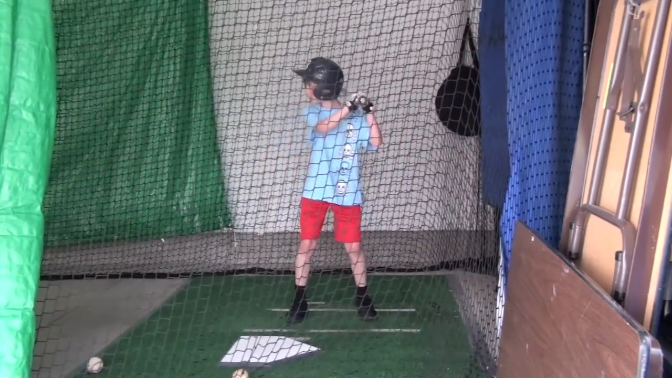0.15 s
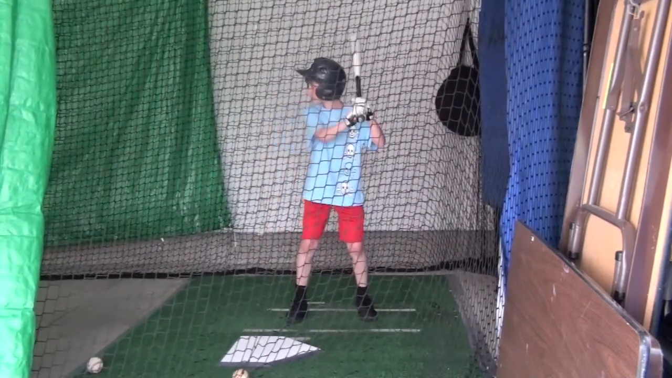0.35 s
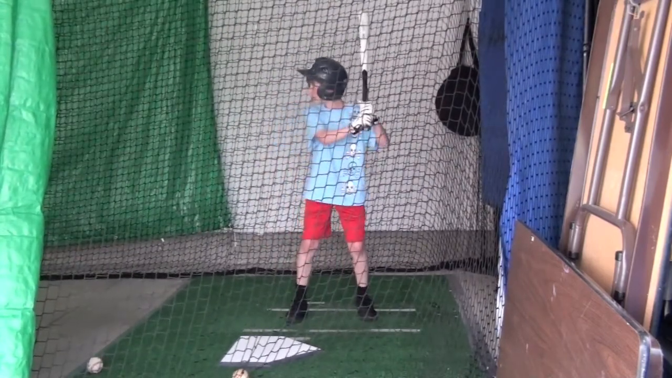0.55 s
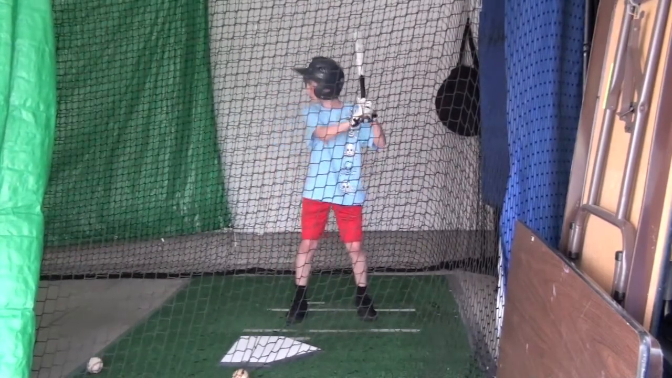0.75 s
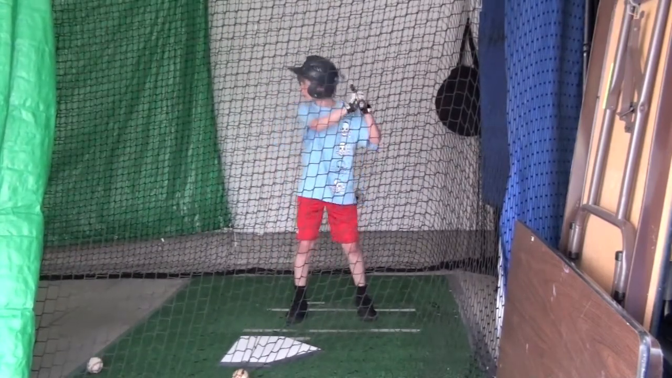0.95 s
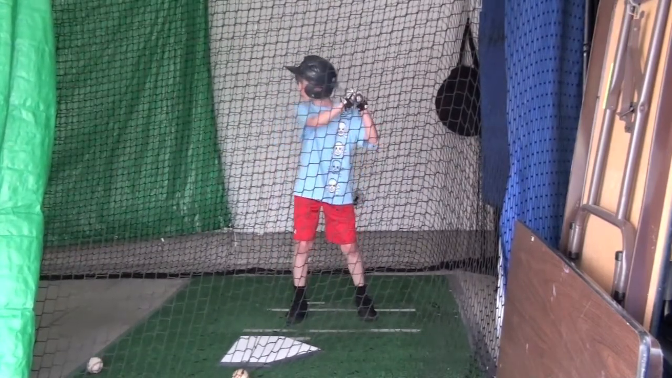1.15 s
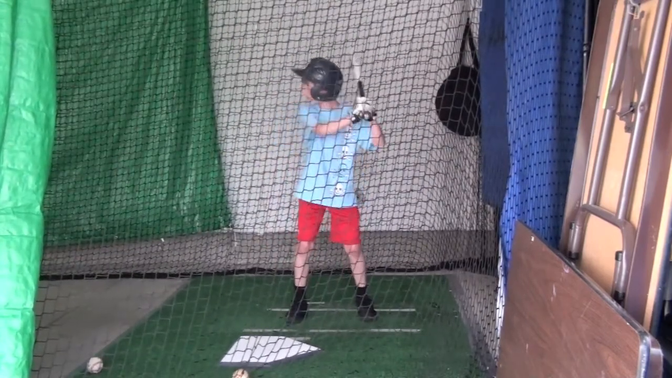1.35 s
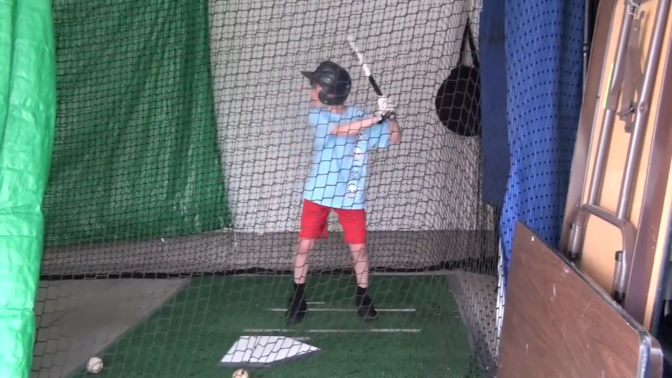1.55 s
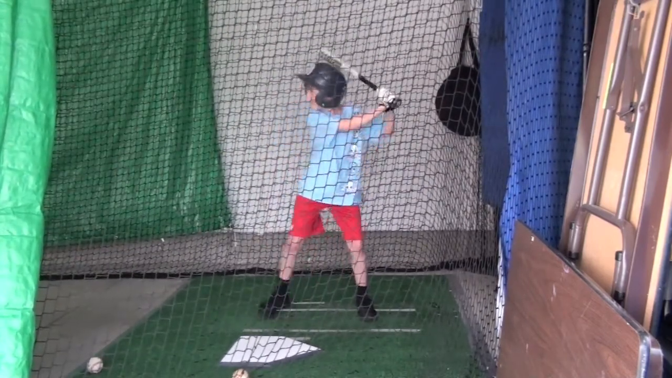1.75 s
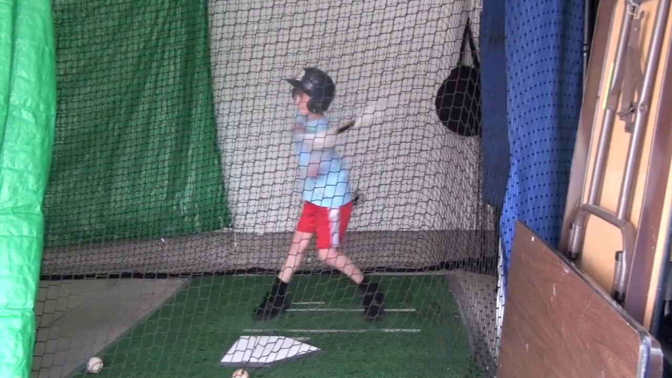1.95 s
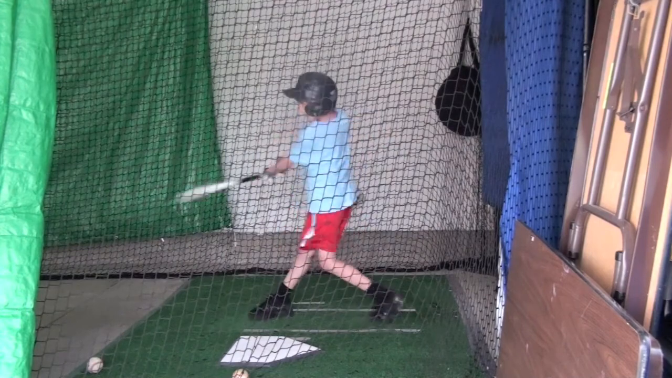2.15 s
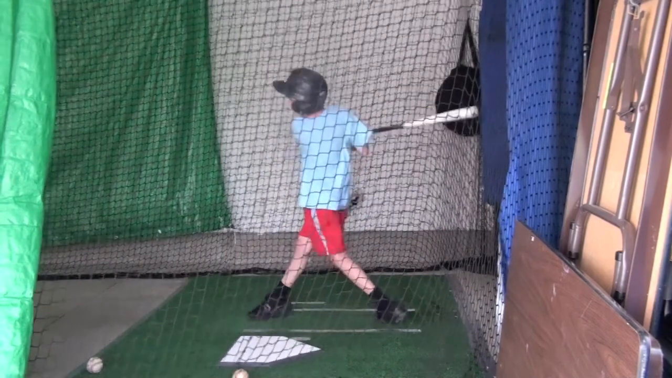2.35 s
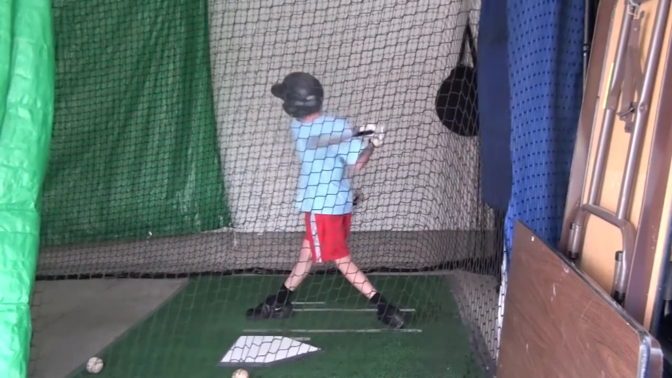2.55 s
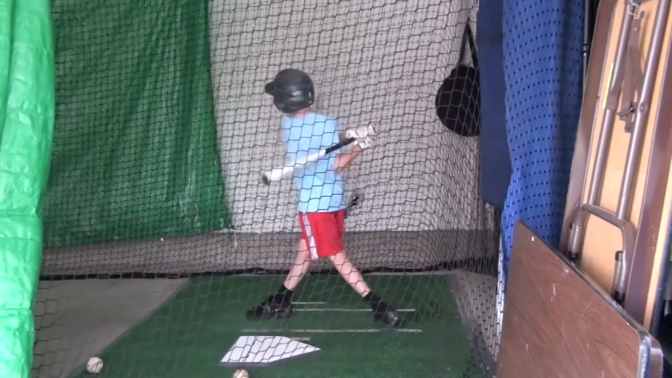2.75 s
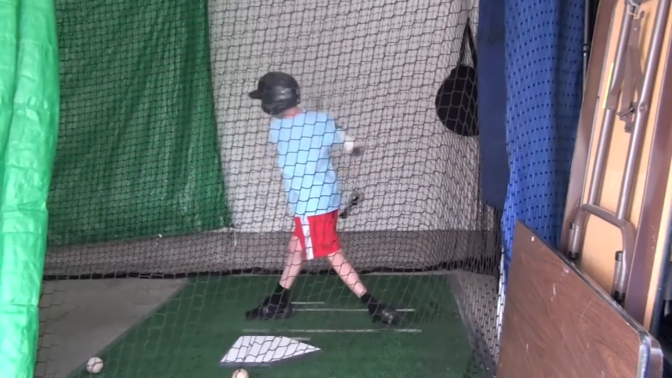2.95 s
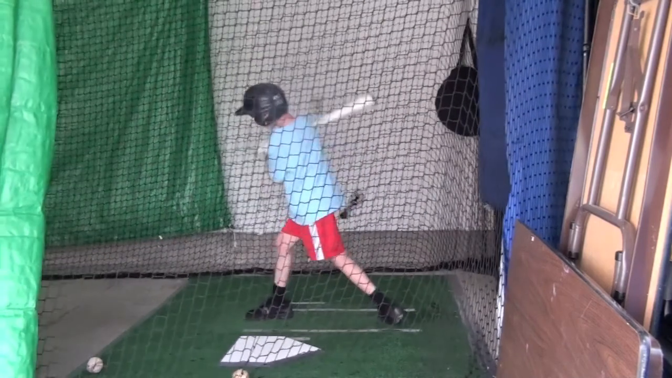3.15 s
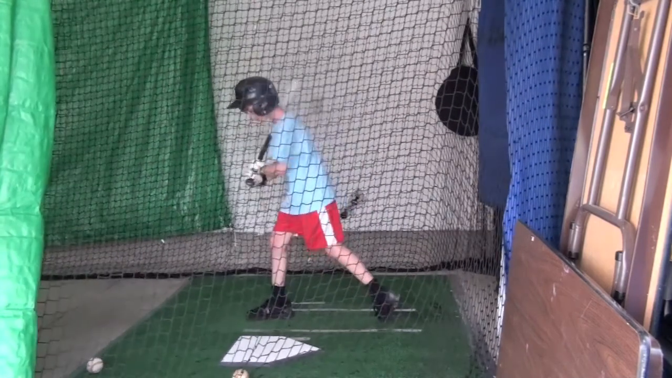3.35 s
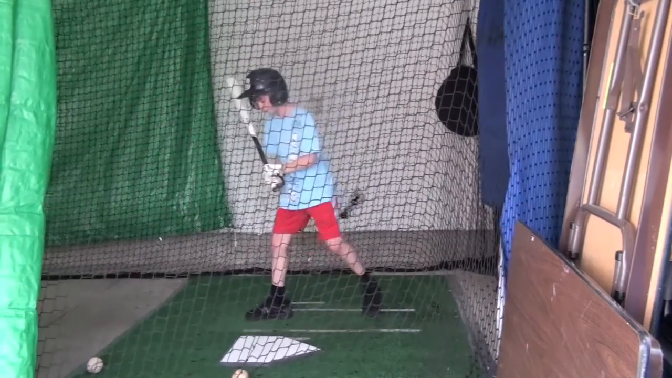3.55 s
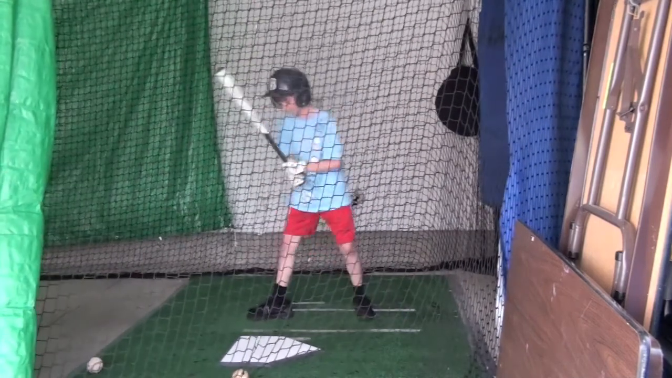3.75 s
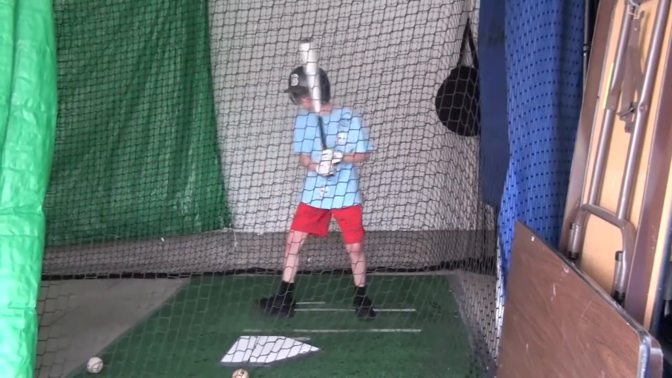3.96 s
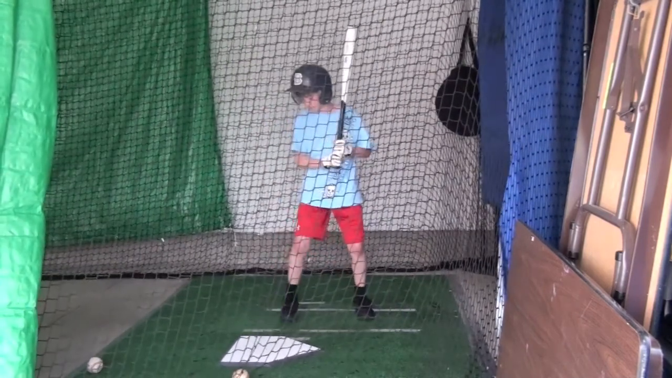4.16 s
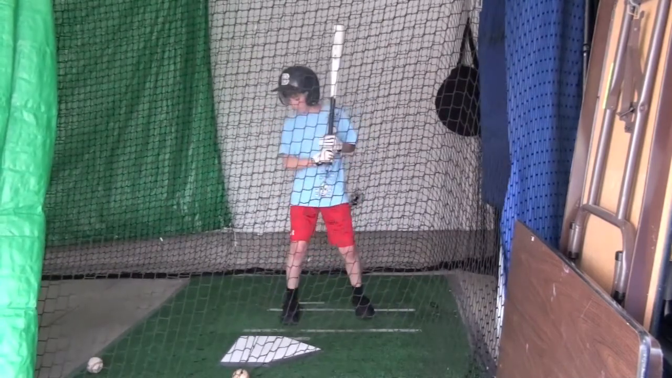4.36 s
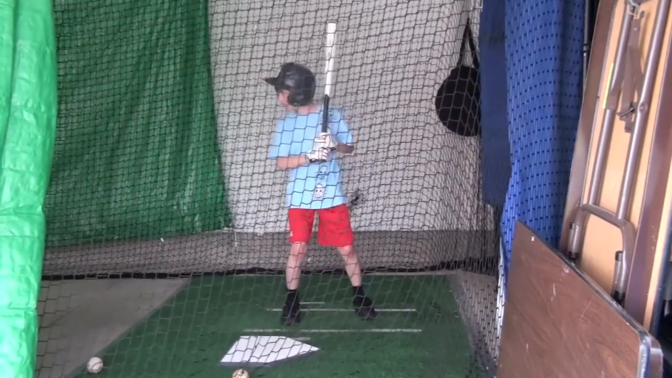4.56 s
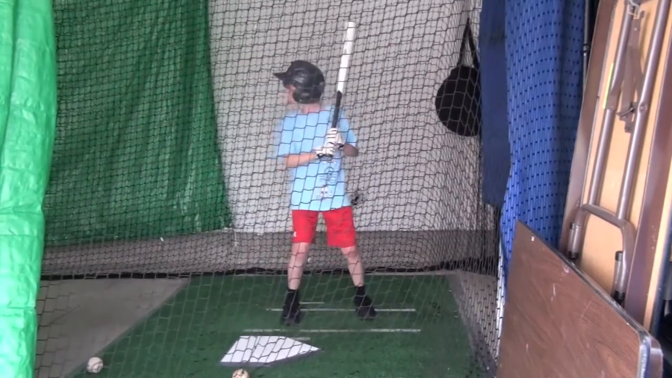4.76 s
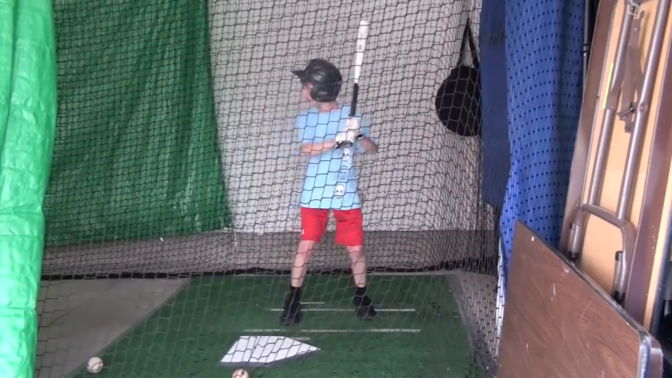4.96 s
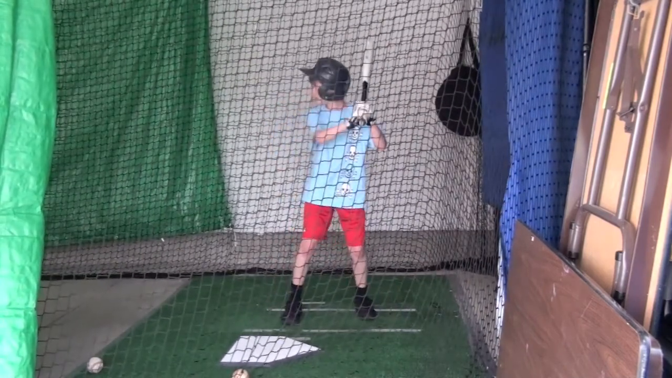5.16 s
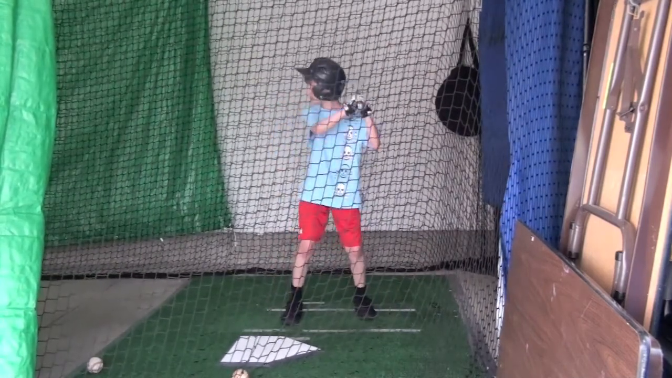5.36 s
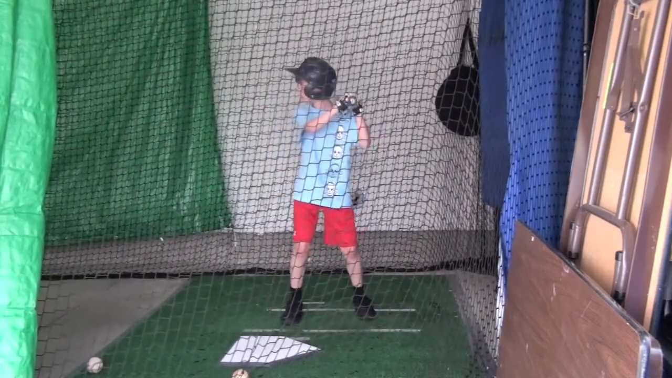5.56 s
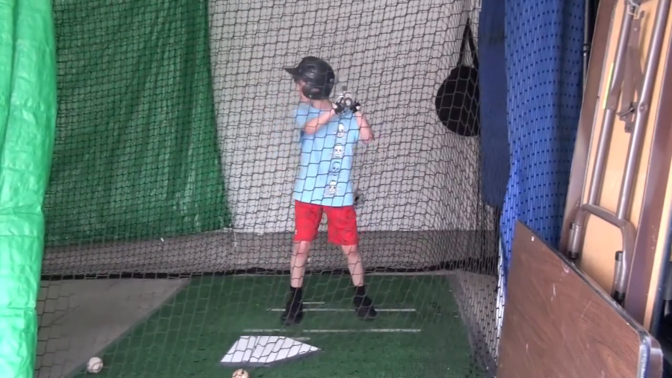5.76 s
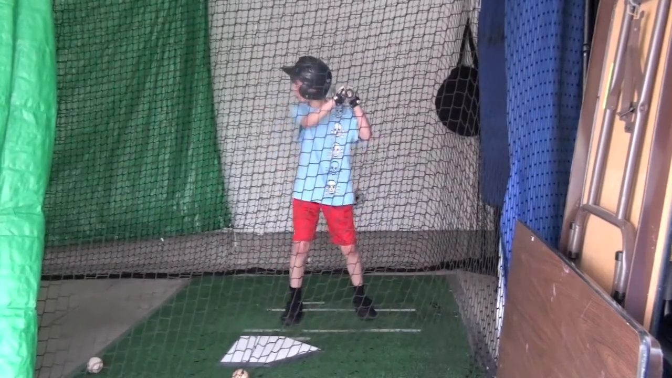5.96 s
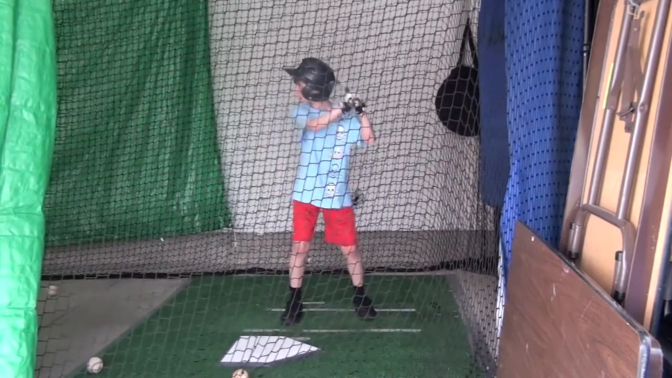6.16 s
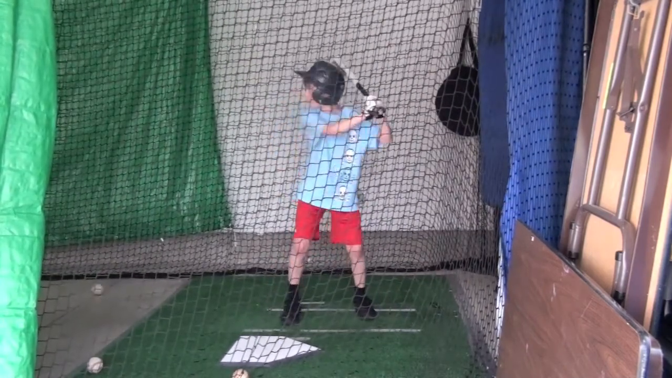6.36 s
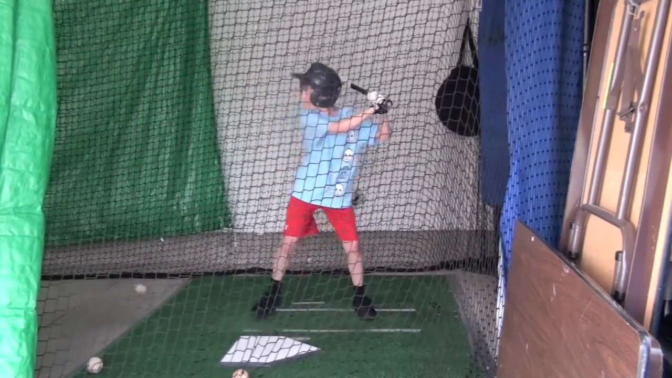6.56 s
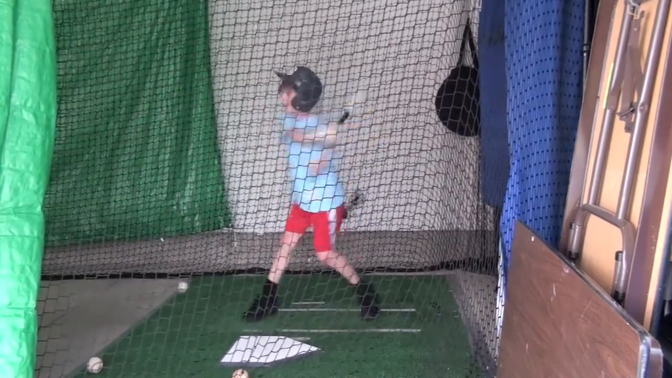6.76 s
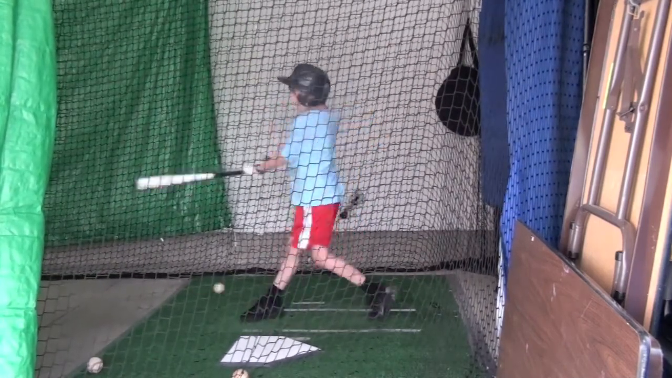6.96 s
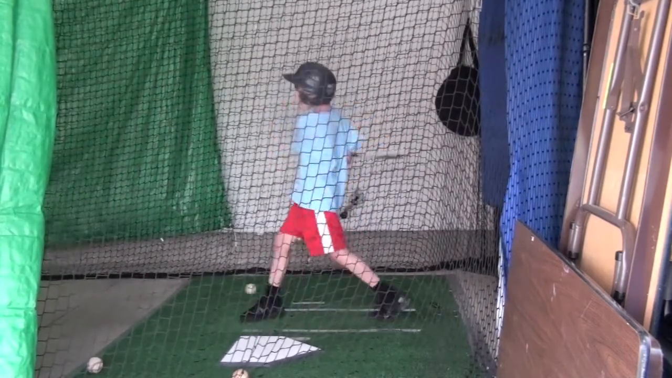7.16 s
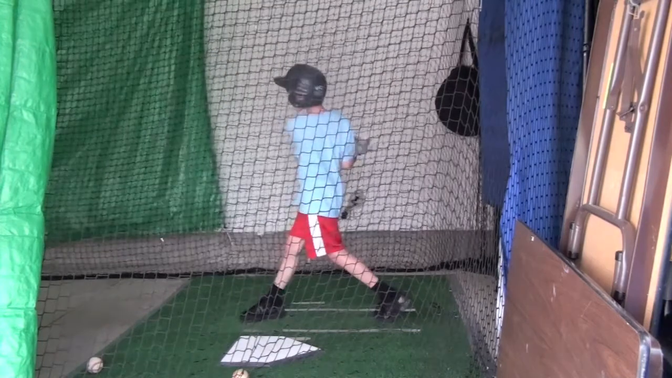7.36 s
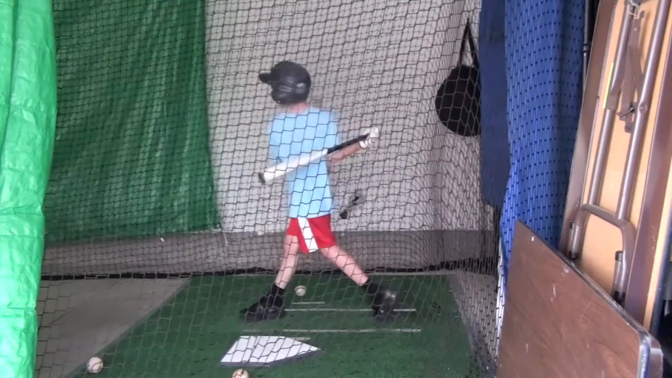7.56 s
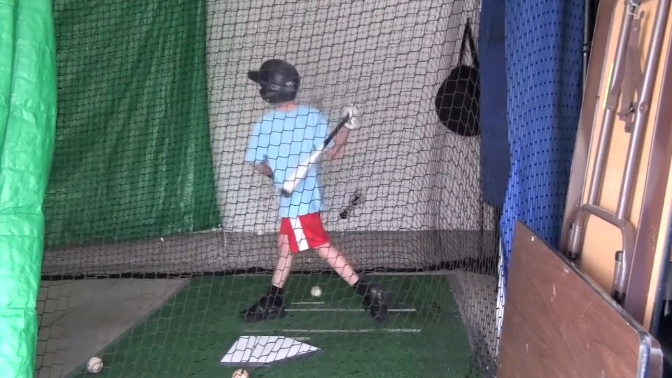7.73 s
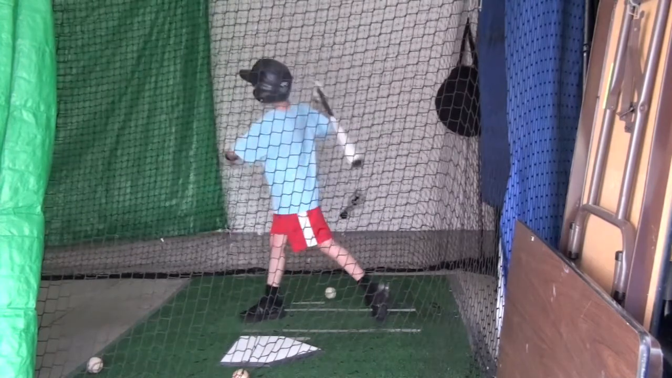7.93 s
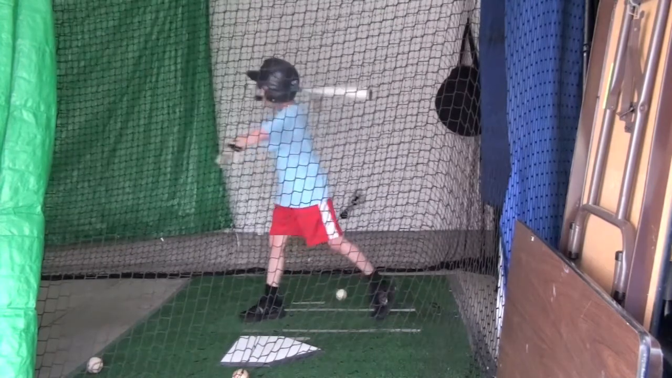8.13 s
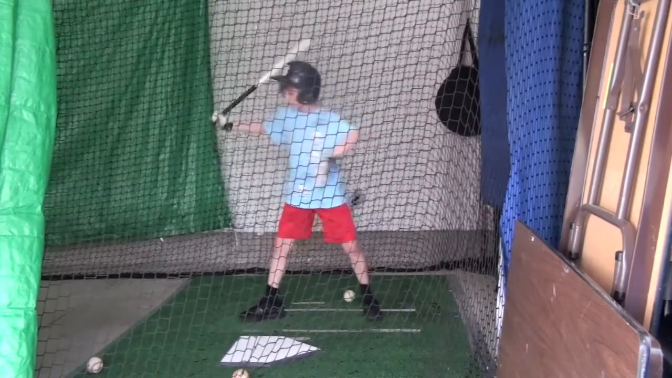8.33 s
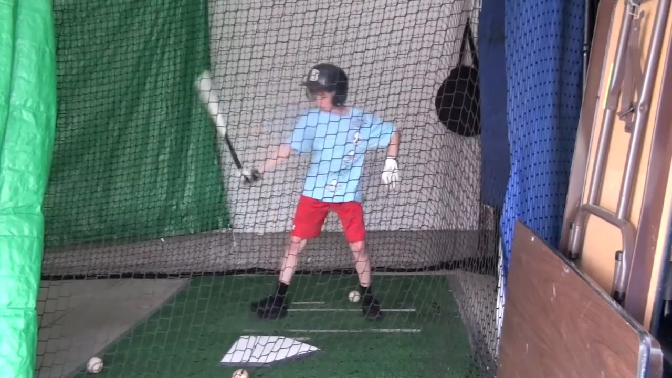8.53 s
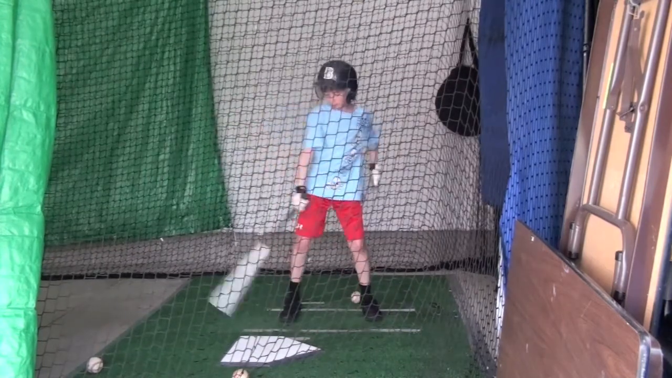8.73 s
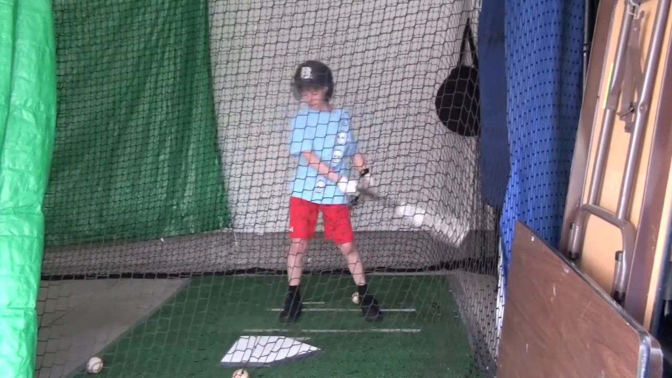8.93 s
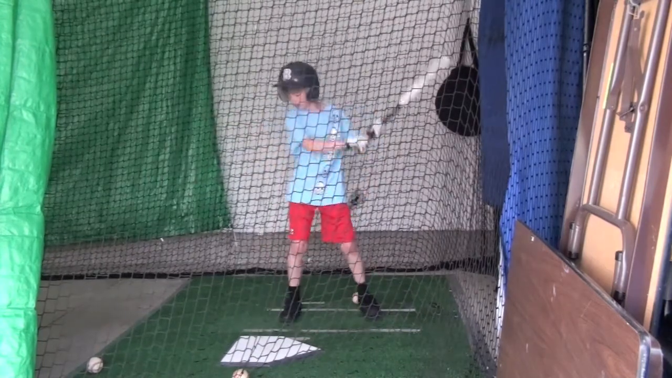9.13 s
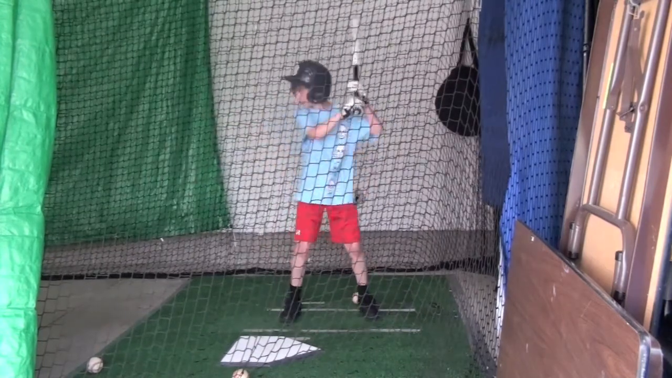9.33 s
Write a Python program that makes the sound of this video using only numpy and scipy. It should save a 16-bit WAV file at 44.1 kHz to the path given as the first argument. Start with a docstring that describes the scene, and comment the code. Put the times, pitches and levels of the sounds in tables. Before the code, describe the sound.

Two sharp cracks of a metal bat on a baseball, about five seconds apart, ring out with a short garage echo. Between them come a double thud against the cage, a shoe rasping on turf and a clack. After the second, the netting swishes and the ball thumps through quickening, fading bounces before a soft scuff. The camera microphone flattens both pings, while a low hum, distant chirps and light clothing rustles fill the gaps.

```python
"""Two loud metal-bat pings in a garage batting cage, among knocks, net swishes, bounces and rustles.
Each hit is a crack plus the barrel's ring, Doppler-spread by the swing as the walls return it.
Balls knock about the cage, rub its mesh and thump on turf; a shoe and the bat's tip scuff the ground.
Birds call faintly outside, over a low motor hum. The camera's limiter flattens each ping,
and its gain control ducks the background for two seconds after."""
import sys
import numpy as np
from scipy import signal
from scipy.fft import rfft, irfft, next_fast_len
from scipy.io import wavfile
from scipy.ndimage import uniform_filter1d, minimum_filter1d, map_coordinates

SR = 44100
rng = np.random.default_rng(int(sys.argv[2]) if len(sys.argv) > 2 else 0)


def pcm_store(signal):
    """Save signal as 16-bit PCM."""
    levels = np.round(np.clip(np.atleast_2d(signal), -1, 1) * 32767)
    wavfile.write(sys.argv[1], SR, levels.astype(np.int16).T)


N = 418509

# bat on ball: (time [s], crack [dB], near walls [dB], crack tilt [dB/oct], ring [dB], bat speed [m/s],
# pitch [ratio], second mode offset [dB], grip damping [ratio])
BAT_HITS = [(2.146, 35, -3, -1.1, 18.5, 11.2, 1.0, -0.5, 1.76),
            (6.9634, 37.5, 0.5, -0.16, 17.5, 9.54, 1.001, -4, 1.36)]


def amp(db):
    """Decibels to gain."""
    return 10 ** (np.asarray(db) / 20)


def unit(x):
    """x at rms 1."""
    return x / np.sqrt(np.mean(x ** 2) + 1e-20)


def along(points, hz):
    """Interpolate (frequency [Hz], value) points on a log axis."""
    knots_hz, values = np.transpose(points)
    return np.interp(np.log(hz + 1), np.log(knots_hz + 1), values)


def tilt(hz, db_per_oct):
    """Treble slope above about 500 Hz, in dB."""
    return db_per_oct * np.log2(1 + hz / 500)


def filtered(x, response):
    """Zero-phase filter with gain response(hz)."""
    n = x.shape[-1]
    padded = next_fast_len(n + 8192)
    hz = np.fft.rfftfreq(padded, 1 / SR)
    return irfft(rfft(x, padded) * response(hz), padded)[..., :n]


def noise(spectrum, shape, db_per_oct=0):
    """Coloured noise of rms 1."""
    white = rng.standard_normal(shape)
    return unit(filtered(white, lambda hz: amp(along(spectrum, hz) + tilt(hz, db_per_oct))))


def pulse(gain_db, db_per_oct=0):
    """Minimum-phase click of energy 1 with the tilted spectrum gain_db(hz)."""
    hz = np.fft.rfftfreq(4096, 1 / SR)
    cepstrum = irfft(np.log(amp(gain_db(hz) + tilt(hz, db_per_oct))))
    half = len(cepstrum) // 2
    click = irfft(np.exp(rfft(2 * cepstrum[:half], 2 * half)))
    return np.pad(click / np.linalg.norm(click), (0, SR))


def ring(modes, t, pitch=1, damping=1):
    """Damped modes, all struck at t = 0."""
    return sum(amp(db - 60 * damping * t / t60_s) * np.sin(2 * np.pi * hz * pitch * t)
               for hz, db, t60_s in modes)


def wobble(rate_hz, size=N):
    """Smooth curve through random knots."""
    knots = rng.standard_normal(int(size * rate_hz / SR) + 4)
    return map_coordinates(knots, [np.arange(size) * rate_hz / SR])


def swell(t, rise_s, fall_s):
    """Rounded envelope peaking at 2 * rise_s."""
    from_peak_s = t - 2 * rise_s
    return np.exp(-(from_peak_s / np.where(from_peak_s < 0, rise_s, fall_s)) ** 2)


def add(track, at_s, sound):
    """Mix a sound into a stereo track."""
    start = max(round(at_s * SR), 0)
    track[:, start:start + sound.shape[1]] += sound[:, :N - start]


def stereo(pair, width):
    """Two unrelated signals as a diffuse field at two close microphones."""
    side = filtered(pair[1], lambda hz: amp(along(width, hz)))
    return np.array([pair[0] + side, pair[0] - side])


def garage(x, direct_db, near_db=-4):
    """Direct path, brief dense cluster off the near walls and a fresh diffuse tail."""
    # reverberation: (frequency [Hz], t60 [s])
    decay = [(100, 0.46), (250, 0.66), (600, 0.71), (1000, 0.72), (1700, 0.71), (3000, 0.7), (7000, 0.61),
             (14000, 0.36)]
    # echo width: (frequency [Hz], side re mid [dB])
    width = [(50, -14), (130, -7), (500, -7.5), (1700, -10), (5000, -10.5), (9000, -8.5), (12000, -20)]
    near_decay_s, build_s = 0.018, 0.001
    hz, frame_s, bins = signal.stft(rng.standard_normal((2, SR)), SR, nperseg=256)
    tail = signal.istft(bins * amp(-60 * frame_s / along(decay, hz)[:, None]), SR, nperseg=256)[1]
    t = np.arange(tail.shape[1]) / SR
    near = rng.standard_normal(tail.shape) * np.exp(-t / near_decay_s)
    build = 1 - np.exp(-t / build_s)
    echo = stereo((unit(tail) + amp(near_db) * unit(near)) * build, width)
    response = echo / np.linalg.norm(echo[0])
    response[:, 0] += amp(direct_db)
    response /= np.linalg.norm(response[0])
    return signal.fftconvolve(x[None], response, axes=1)[:, :len(x)]


def rub(envelope, db_per_oct):
    """Sliding friction in the garage: many small catches under an envelope."""
    # fabric friction: (frequency [Hz], density [dB])
    cloth = [(60, -30), (300, -16), (800, -9), (3000, -4.5), (6000, -7), (9000, -9.5), (12000, -10),
             (15500, -26)]
    friction = noise(cloth, len(envelope), db_per_oct)
    catches = amp(5.1 * wobble(305.1, size=len(envelope)))
    return garage(envelope * unit(friction * catches), direct_db=-4)


def background():
    """Steady motor hum, rumble and microphone hiss; building murmur and outdoor wash recede later on."""
    # noise spectra: (frequency [Hz], density [dB])
    rumble_spectrum = [(20, -21), (35, -3.5), (55, -1.5), (85, -5), (120, 2.5), (190, 2), (400, -28),
                       (1000, -39.5)]
    murmur_spectrum = [(80, -19), (170, -7), (270, 3.5), (400, -5.5), (600, -12.5), (1200, -69)]
    wash_spectrum = [(150, -5), (500, -0.5), (1000, 1.5), (2000, -5), (4000, -17.5), (8000, -25),
                     (15500, -45)]
    hiss_spectrum = [(500, 2.5), (3000, 7.5), (5000, 4.5), (9000, -4.5), (12500, -3), (15500, -5)]
    # background width: (frequency [Hz], side re mid [dB])
    width = [(60, -29), (110, -25.5), (200, -26.5), (380, -14), (700, -9), (1290, -6.5), (2380, -6),
             (4400, -5.5), (8120, -4.5), (15000, -16)]
    sag_at_s, sag_db_per_s = 4.4, 1.4
    recede_at_s, recede_db_per_s, wash_floor_db = 3.21, 3.5, -53.5
    hum_hz = 59.3
    t = np.arange(N) / SR
    echo_db = 5 * np.exp(-t / 0.19)  # an earlier sound's echo dies away at the start
    rumble = amp(-50.5) * noise(rumble_spectrum, (2, N))
    murmur_db = -45 - sag_db_per_s * np.maximum(t - sag_at_s, 0)
    murmur = amp(murmur_db + echo_db + 0.7 * wobble(7.6)) * noise(murmur_spectrum, (2, N))
    wash_db = np.maximum(-44.5 - recede_db_per_s * np.maximum(t - recede_at_s, 0), wash_floor_db)
    wash = amp(wash_db + echo_db) * noise(wash_spectrum, (2, N))
    hiss = amp(-55.5) * noise(hiss_spectrum, (2, N))
    hum = amp(-48.5 + 1.3 * wobble(4.4)) * np.sin(2 * np.pi * hum_hz * t + 0.2 * wobble(5))
    return stereo(rumble + murmur + wash + hiss, width) + hum


def bird_note(t, length_s, from_hz, to_hz, buzz_hz=0):
    """A whistle glides to its final pitch; a fast warble turns it into a buzz."""
    warble_hz, glide_s = 77, 0.0344
    progress = np.minimum(t / length_s, 1)
    warble = 0.85 * np.sin(2 * np.pi * warble_hz * t) + 0.281 * wobble(250, size=len(t))
    hz = to_hz + (from_hz - to_hz) * np.exp(-t / glide_s) * (1 - progress) + buzz_hz * warble
    envelope = np.minimum(4 * np.abs(np.sin(np.pi * progress)), 1)
    return envelope * np.sin(2 * np.pi * np.cumsum(hz) / SR)


def birds(t):
    """Four kinds of call drift in from outside."""
    # slurs up to a held note: (time [s], length [s], top pitch [Hz], level [dB])
    slurs = [(0.103, 0.036, 4650, -51), (.36, .05, 4630, -59), (0.578, .05, 4040, -54),
             (1.23, .045, 4200, -62), (4.79, 0.08, 4010, -54.5), (5.508, .085, 4330, -63)]
    # quick falling chips: (time [s], level [dB])
    chips = [(5.298, -55), (5.555, -54), (5.724, -56), (5.883, -54), (6.052, -57)]
    # level, buzzing trills: (time [s], level [dB])
    trills = [(1.36, -46.5), (2.95, -47.5)]
    # rising buzzes that clear into a whistle: (time [s], level [dB], whistle delay [s])
    wheezes = [(6.236, -48, 0.0135), (6.612, -47.5, .07)]
    calls = [(at_s, db, bird_note(t, length_s, 0.94 * hz, hz)) for at_s, length_s, hz, db in slurs]
    calls += [(at_s, db, bird_note(t, 0.0295, 3850, 2900)) for at_s, db in chips]
    calls += [(at_s, db, bird_note(t, 0.55, 2560, 2560, buzz_hz=275)) for at_s, db in trills]
    for at_s, db, delay_s in wheezes:
        calls.append((at_s, db, bird_note(t, 0.165, 2750, 3030, buzz_hz=275)))
        calls.append((at_s + delay_s, db - 5, bird_note(t, 0.212, 2750, 3445)))
    out = np.zeros((2, N))
    for at_s, db, call in calls:
        add(out, at_s, garage(amp(db) * np.sqrt(2) * call, direct_db=1))
    return out


def rustles_and_shuffle(t):
    """Soft rustles of clothes and netting, and one low foot shuffle; each rises faster than it falls."""
    # (peak time [s], length [s], level [dB], tilt [dB/oct]); the steepest tilt is the shuffle
    rubs = [(2.661, 0.41, -41, -3), (3.066, .07, -34.5, -10), (4.897, .07, -48.5, -6.5),
            (5.181, .065, -49.5, -4), (6.329, .14, -45.5, -29), (6.466, 0.05, -53, 0),
            (7.771, 0.23, -40, -4.5), (8.449, .6, -54, 1.5), (8.748, .09, -44, -2), (9.356, .1, -44, -5)]
    out = np.zeros((2, N))
    for peak_s, length_s, db, db_per_oct in rubs:
        rise_s = 0.34 * length_s
        add(out, peak_s - 2 * rise_s, rub(amp(db) * swell(t, rise_s, length_s - rise_s), db_per_oct))
    return out


def shoe_drag(t):
    """A shoe slides over turf with a thin rasp, speeding up and slowing down."""
    # sole friction: (frequency [Hz], density [dB])
    sole = [(1000, -20), (2500, -14), (3200, 3), (3650, -7), (4300, -0.5), (4850, -2.5), (5600, -4.5),
            (7500, -13.5), (10000, -16.5), (15500, -26)]
    at_s, length_s = 3.655, 0.33
    speed = np.sin(np.pi * np.minimum(t / length_s, 1))
    out = np.zeros((2, N))
    add(out, at_s, garage(amp(-40) * speed * noise(sole, len(t)), direct_db=-11))
    return out


def bat_scuff(t):
    """The bat's tip swings down and scuffs the turf."""
    # tip on turf: (frequency [Hz], density [dB])
    scuff = [(200, -21), (550, -6.5), (760, 2), (900, -5), (1250, -2.5), (2000, -4.5), (2700, -11),
             (5000, -14), (8000, -15.5), (11000, -12), (15500, -36)]
    at_s, rise_s = 8.814, 0.013
    contact = (t / rise_s) ** 2 * np.exp(2 - 2 * t / rise_s)
    out = np.zeros((2, N))
    add(out, at_s, garage(amp(-30) * contact * noise(scuff, len(t)), direct_db=-12.5))
    return out


def swings(t):
    """The shirt rustles louder as each swing gathers speed, up to contact."""
    swing_s, peak_db, growth_db = 0.3, -42, 10
    progress = np.minimum(t / swing_s, 1)
    effort = amp(peak_db + growth_db * (progress - 1)) * (t < swing_s)
    out = np.zeros((2, N))
    for hit_s, *_ in BAT_HITS:
        add(out, hit_s - swing_s, rub(effort, db_per_oct=-2.1))
    return out


def net(t):
    """The mesh swishes as it stops a ball."""
    # ball into net: (peak time [s], level [dB])
    catches = [(2.29, -25), (7.215, -10.5), (7.265, -14)]
    rise_s, fall_s = 0.015, 0.033
    out = np.zeros((2, N))
    for peak_s, db in catches:
        add(out, peak_s - 2 * rise_s, rub(amp(db) * swell(t, rise_s, fall_s), db_per_oct=-5))
    return out


def bounces(t):
    """Turf cushions the ball: dull thumps, ever closer together, each with a brush of fibres."""
    # ball on turf: (time [s], level [dB], roll-off corner [Hz])
    landings = [(7.267, 14.5, 282), (7.614, 7.5, 481), (7.935, -1, 430), (8.141, -4, 302),
                (8.271, -7.5, 320)]
    brush = swell(t, rise_s=0.004, fall_s=0.028)
    out = np.zeros((2, N))
    for at_s, db, corner_hz in landings:
        # (frequency [Hz], density [dB])
        spectrum = [(40, -11), (90, -12), (140, -8), (200, 1),
                    (corner_hz, 0), (2 * corner_hz, -21), (3000, -34), (12000, -50)]
        thump = pulse(lambda hz: along(spectrum, hz))
        add(out, at_s, amp(db) * garage(thump, direct_db=-18, near_db=0))
        add(out, at_s, rub(amp(db - 43) * brush, db_per_oct=-3.5))
    return out


def knocks(t):
    """Short blows about the cage, between thud and clack, set its tubing ringing."""
    # blows: (time [s], level [dB], hardness [0-1], tilt [dB/oct], near walls [dB], metal ring [dB])
    blows = [(3.157, 17, 0, 0.5, -3, -34), (3.177, 15, 0.28, -0.5, 3, -43.5),
             (4.109, 8.5, 0.64, 2.5, -12.5, -29.5), (7.103, 8, 0.14, -3, 21, -54)]
    # spectra at hardness 0 and 1: (frequency [Hz], density [dB])
    thud = [(40, -35), (110, -15), (270, -7), (420, 0), (780, -3.5), (1400, -11.5), (2000, -13),
            (3100, -12.5), (3900, -22.5), (7000, -24), (10000, -26.5), (12000, -25), (15500, -38)]
    clack = [(40, -72), (150, 2.5), (400, -1), (750, -0.5), (1300, 0), (1900, -4.5), (2900, -10.5),
             (4600, -8.5), (5800, -13), (6700, -12.5), (10500, -22), (12000, -20.5), (15500, -33)]
    # tubing modes: (frequency [Hz], level [dB], t60 [s])
    tubing = [(2316, 2, 0.13), (2430, -1.5, 0.16), (3870, -13, 0.17), (6620, -2.5, 0.18), (7530, -3, 0.09)]
    out = np.zeros((2, N))
    for at_s, db, hardness, db_per_oct, near_db, metal_db in blows:
        blow = pulse(lambda hz: (1 - hardness) * along(thud, hz) + hardness * along(clack, hz), db_per_oct)
        add(out, at_s, amp(db) * garage(blow, direct_db=-28.5, near_db=near_db))
        add(out, at_s, amp(metal_db) * garage(ring(tubing, t), direct_db=-18))
    return out


def bat_hits(t):
    """The ball cracks on the barrel; each wall returns the moving barrel's ring at its own Doppler shift."""
    # barrel modes: (frequency [Hz], level [dB], t60 [s])
    barrel = [(1745, 0, 0.42), (2490, -9, 0.21), (4076, -3.5, 0.11), (7530, -23, .08)]
    # ball on barrel: (frequency [Hz], density [dB])
    crack_spectrum = [(60, -20), (200, -15.5), (500, -1.5), (900, -0.5), (1350, -1.5), (2300, 0.5),
                      (2900, -7.5), (3600, -3), (4800, -11.5), (8000, -16.5), (12000, -22), (15500, -32.5)]
    paths, sound_m_per_s = 8, 343
    build = 1 - np.exp(-t / 0.008)  # the ring is mostly echo, so it lags the crack
    out = np.zeros((2, N))
    for at_s, crack_db, near_db, db_per_oct, ring_db, bat_m_per_s, pitch, second_db, damping in BAT_HITS:
        crack = pulse(lambda hz: along(crack_spectrum, hz), db_per_oct)
        add(out, at_s, amp(crack_db) * garage(crack, direct_db=-21, near_db=near_db))
        # the contact point sets the second mode's strength
        modes = [(hz, db + (k == 1) * second_db, t60_s) for k, (hz, db, t60_s) in enumerate(barrel)]
        for toward in np.linspace(-1, 1, paths):
            doppler = 1 + toward * bat_m_per_s / sound_m_per_s
            ping = amp(ring_db) / np.sqrt(paths) * ring(modes, t, pitch * doppler, damping)
            add(out, at_s, garage(build * ping, direct_db=-19, near_db=-20))
    return out


def scene():
    """Batter, balls and outdoors, a touch louder on the left."""
    t = np.arange(SR + SR // 4) / SR  # time within one event
    play = bat_hits(t) + knocks(t) + bounces(t) + net(t) + swings(t) + shoe_drag(t) + bat_scuff(t)
    return (play + background() + birds(t) + rustles_and_shuffle(t)) * amp([[0.2], [-0.2]])


def limiter(x, ceiling_db, release_db_per_s, depth_db=np.inf):
    """Gain drops by the excess, at most depth_db, just ahead of a peak, then recovers linearly in dB."""
    peak_db = 20 * np.log10(np.abs(x).max(0) + 1e-9)
    excess_db = np.clip(peak_db - ceiling_db, 0, depth_db)
    recovery_db = release_db_per_s * np.arange(N) / SR
    gain_db = recovery_db - np.maximum.accumulate(excess_db + recovery_db)
    lookahead_db = minimum_filter1d(gain_db, size=48)
    return x * amp(uniform_filter1d(lookahead_db, size=64))


def record(dry):
    """Camera: slow gain control, two faster limiters, band limit."""
    ducked = limiter(dry, ceiling_db=3, release_db_per_s=3, depth_db=6)
    limited = limiter(ducked, ceiling_db=0.3, release_db_per_s=115)
    flattened = limiter(limited, ceiling_db=-3, release_db_per_s=700)
    return filtered(flattened, lambda hz: hz < 15800)


dry = scene()
out = record(dry)
pcm_store(out)
```